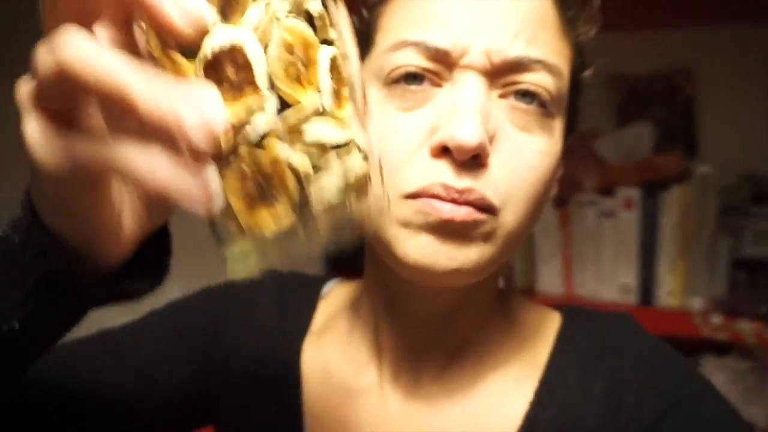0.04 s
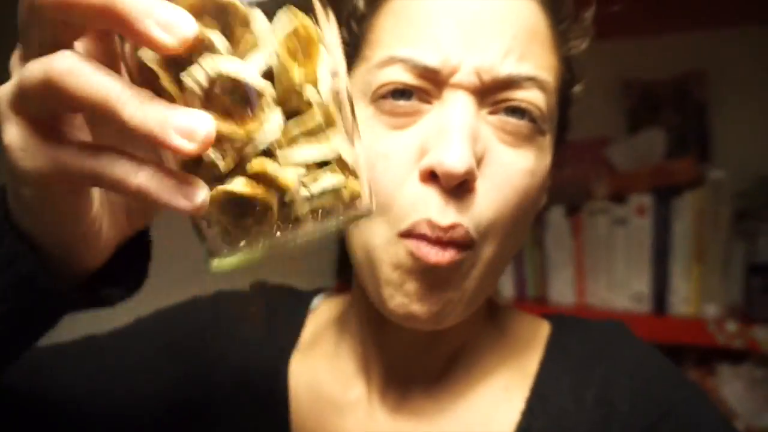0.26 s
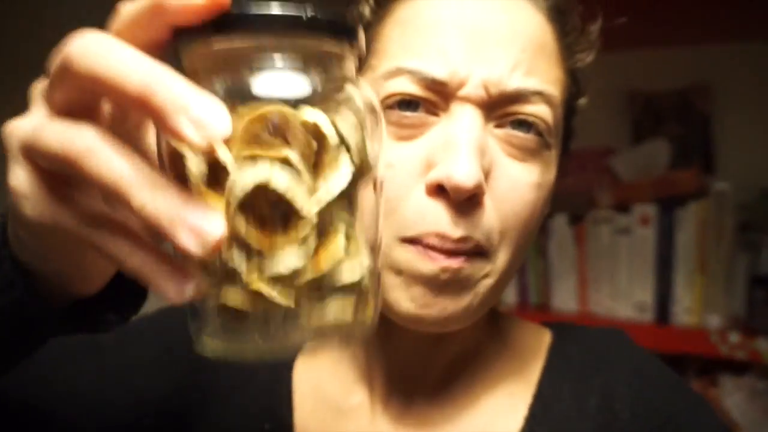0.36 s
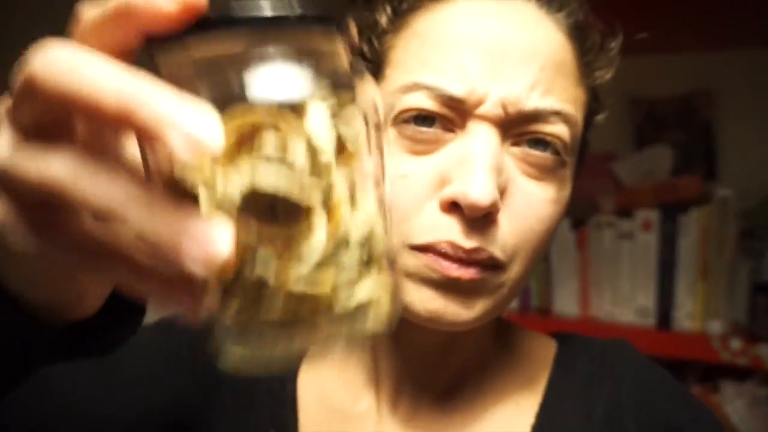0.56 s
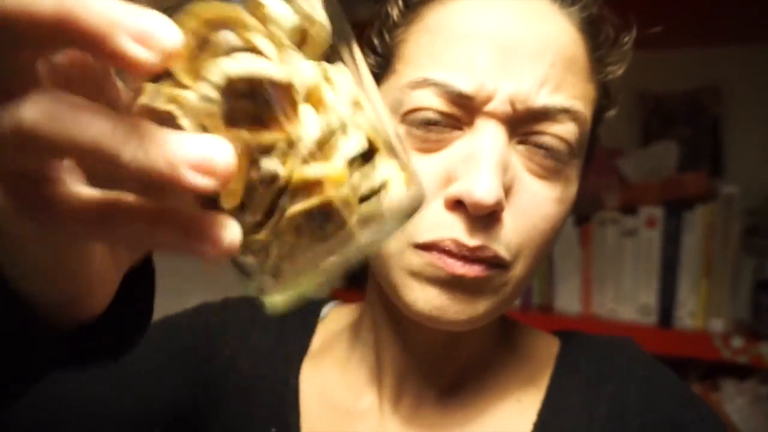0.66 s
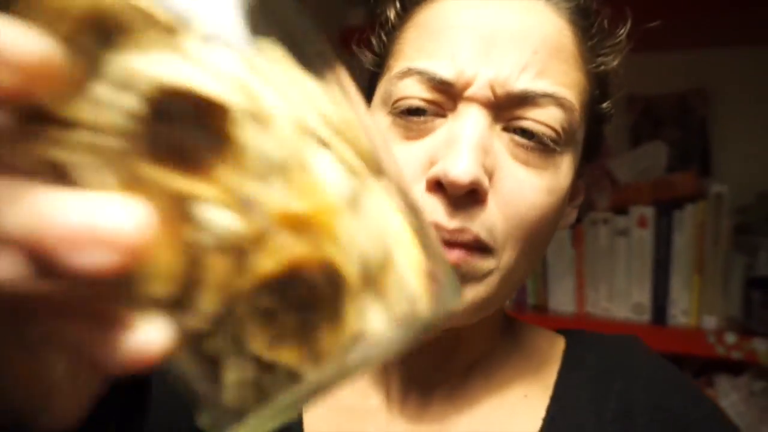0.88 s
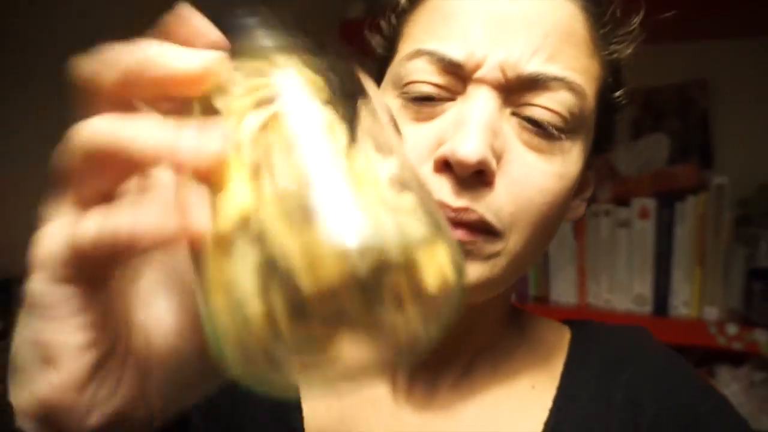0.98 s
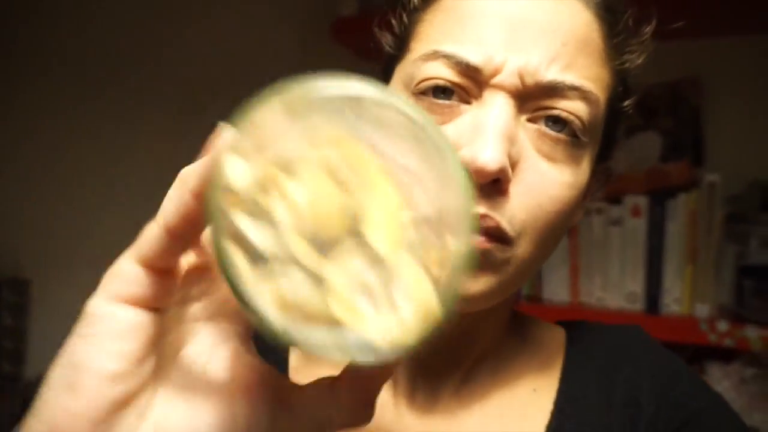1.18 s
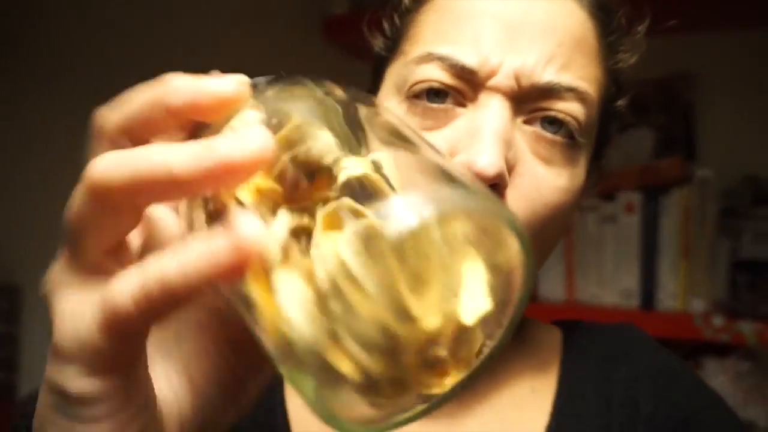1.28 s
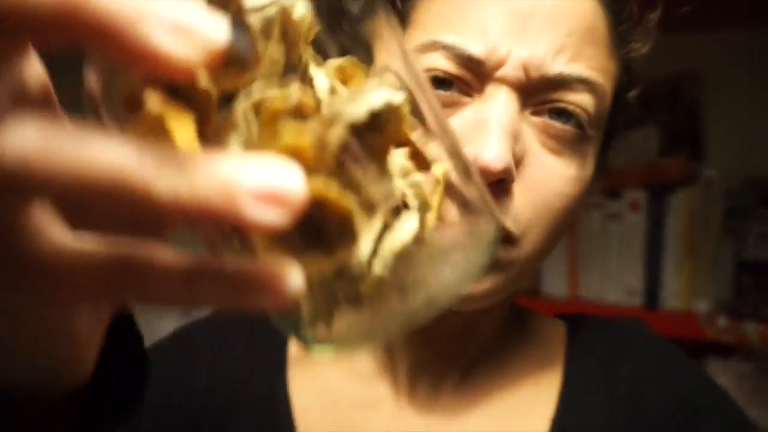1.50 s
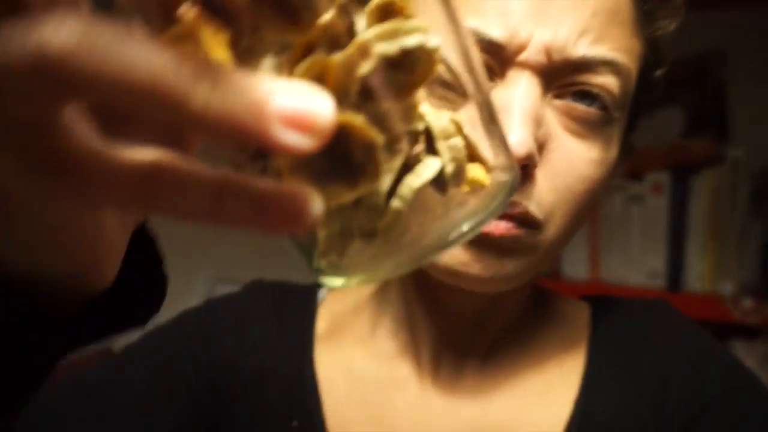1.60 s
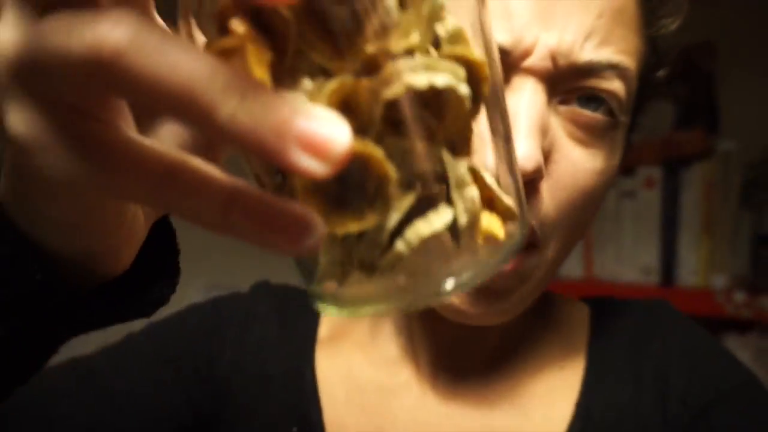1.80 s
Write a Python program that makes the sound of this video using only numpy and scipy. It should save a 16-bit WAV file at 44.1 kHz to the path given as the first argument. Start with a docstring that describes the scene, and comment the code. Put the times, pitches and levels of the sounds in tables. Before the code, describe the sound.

A glass jar of dry, hard slices is shaken about five times a second, clinking and knocking, then tipped so the heap rolls over and settles; close, stereo, nearly centred, with slight room reverberation and faint room tone.

```python
"""Hard dried fruit slices in a glass jar, close by in a small room, over quiet room tone.
In each of five shakes loose slices click on the wall (excited wall modes), the heap lands with a knock
(a short push that rings the body modes) and slices slide back (dense random touches filtered by the wall).
The jar is then tipped over: the heap tumbles along it in many dull blows, and a last few pieces settle."""
import sys
import numpy as np
from scipy import signal
from scipy.fft import rfft, irfft
from scipy.io import wavfile
from scipy.ndimage import uniform_filter1d

SR = 44100
rng = np.random.default_rng(int(sys.argv[2]) if len(sys.argv) > 2 else 0)


def dump_mix(stems):
    """Bounce the given channels to the path in sys.argv[1] as a 16-bit WAV at rate SR."""
    frames = np.atleast_2d(stems).T  # one column per channel
    limited = np.clip(frames, -1, 1)  # hard clip at full scale
    pcm = np.round(limited * 32767).astype(np.int16)
    wavfile.write(sys.argv[1], SR, pcm)


N = 81585  # length in samples

# Levels of single sources are dry, before the room, the left-right balance and the filters at the end.
# Levels of modes and spectra are relative; each ring also draws its mode levels and phases at random.

# Room tone spectrum: (frequency [Hz], relative density [dB per Hz])
TONE_SPECTRUM = [(25, -33), (48, -6.5), (75, -22.5), (100, -8), (130, -1), (200, -2.5), (310, -6),
                 (400, 0.5), (520, -2.5), (900, -15), (1500, -4.5), (2500, -13.5), (6000, -17),
                 (15000, -28)]
TONE_DB, TONE_WIDTH = -57, 0.19  # rms level; side over mid

# Single slices strike the glass: (time [s], then the level in each of the four CLICK_BANDS [dB])
SLICE_CLICKS = [(0.148, -43.5, -48.5, -51, -59), (.185, -24.5, -26, -26.5, -37),
                (0.1882, -30.5, -51, -36, -30), (0.24, -27, -49, -30, -37),
                (0.2501, -29.5, -28.5, -28, -26), (0.2644, -33.5, -38, -44, -42),
                (.301, -36.5, -57, -52, -49), (0.3835, -34, -40, -36, -39), (.389, -28.5, -28, -33, -29.5),
                (0.3958, -26.5, -27.5, -30, -37), (0.4014, -21.5, -49, -40, -43),
                (0.411, -22.5, -31, -34, -49), (0.457, -52, -32.5, -32, -48), (.465, -34, -40, -29.5, -35),
                (.575, -41, -38.5, -41, -39.5), (.594, -27.5, -32.5, -38, -40),
                (.601, -26, -36, -34.5, -47), (0.602, -30, -34.5, -45, -39),
                (0.649, -38, -28.5, -30.5, -37), (0.678, -58, -38, -33.5, -40),
                (0.779, -28.5, -38.5, -46, -60), (0.7924, -36, -33, -45, -37),
                (0.796, -28, -40.5, -47, -44), (0.804, -28, -46, -40, -45),
                (0.8096, -23.5, -31.5, -43, -31), (0.8479, -53, -30, -20, -55), (0.857, -52, -49, -35, -42),
                (0.8739, -33, -26, -30, -33), (0.897, -33, -31, -41, -49), (0.9726, -23, -29.5, -34, -43),
                (0.9836, -24, -57, -53, -55), (0.9944, -31, -53, -48, -50), (1.0047, -27.5, -39, -53, -60),
                (1.007, -34, -29, -42, -57), (1.016, -24, -31.5, -46, -52), (1.056, -48, -30, -41, -49),
                (1.066, -45, -33.5, -41, -34), (1.094, -41, -36, -32.5, -25),
                (1.116, -33.5, -33.5, -31, -32), (1.1366, -20.5, -26, -28, -35),
                (1.165, -32, -33, -39, -57), (1.2216, -34, -26, -23.5, -42), (1.348, -59, -36, -28.5, -47),
                (1.383, -42, -50, -37.5, -57), (1.493, -40.5, -38.5, -44.5, -48),
                (1.5084, -41.5, -78, -68, -49), (1.557, -37, -65, -56, -49),
                (1.5716, -28.5, -27.5, -43, -57), (1.5907, -36.5, -39, -59, -60),
                (1.615, -39, -42, -54, -71), (1.666, -60, -39, -43.5, -61), (1.695, -69, -56, -40, -63),
                (1.8065, -43, -73, -54, -72), (1.8136, -55, -76, -72, -66)]
# Edges of the four click bands: (frequency [Hz])
CLICK_BANDS = [900, 5200, 10200, 12500, 16500]
# Glass wall under a sharp touch: (frequency [Hz], click level [dB], slide level [dB], t60 [s])
WALL_MODES = [(968, -25, -20, .19), (2882, -11, -12, .15), (3880, -3, -7, .022), (4170, 2, -4, .028),
              (4416, -3, -8, .022), (6015, -10, -8, .06), (6290, -9, -9, .055), (7400, -3, -10, .011),
              (9090, -4, -4, .028), (11255, -1, -3, .042), (11400, -3, -5, .025), (13550, 0, -2, .018),
              (14300, -3, -2, .013)]
# Dry crack of a slice: (frequency [Hz], relative density [dB per Hz])
CRACK_SPECTRUM = [(100, -18), (600, -12), (1200, -9.5), (2300, -2.5), (4200, 8.5), (6500, 1), (8200, -3),
                  (10200, -8.5), (11300, -0.5), (12500, -7), (13500, 8.5), (15000, 4.5), (16000, -42)]
CLICK_CRACK_DB, SLIDE_CRACK_DB = 0, 3.5  # crack against wall ring
CRACK_T60_S, CRACK_WIDTH = 0.0032, 0.73  # width: side over mid
CONTACT_S, CHATTER = 0.0011, 0.71  # decay time and strength of the chatter after first contact
WALL_PHASE_RAD = 0.45  # phase offset of each ringing mode, opposite in the two channels

# Slices slide over the glass:
# (loudest at [s], rise [s], fall [s], rustle level [dB], treble tilt [dB per octave], singing level [dB])
SLIDES = [(0.167, 0.017, 0.037, -43.5, -4, -63), (0.248, 0.034, 0.054, -34, -2, -43.5),
          (0.396, 0.014, 0.034, -35, -5, -58), (0.473, 0.021, 0.065, -36, 1, -35.5),
          (.655, 0.017, 0.043, -32.5, -1, -34), (0.863, 0.038, 0.052, -33, -0.5, -35),
          (1.022, 0.037, 0.11, -37.5, -5, -56), (1.151, 0.036, 0.081, -33, -2.5, -45.5),
          (1.369, 0.019, .03, -47, -5, -38), (1.504, 0.019, 0.013, -44.5, -6.5, -51),
          (1.586, 0.034, 0.037, -44.5, -4.5, -44.5), (1.697, 0.041, 0.02, -58, 16, -44.5)]
# Close pair of modes that sings when the wall is rubbed: (frequency [Hz], relative level [dB], t60 [s])
SINGING_MODES = [(5913, -15, 0.19), (6030, -17, 0.04)]
GRAINS_PER_S, GRAIN_SPREAD_DB = 5000, 2

# The heap lands:
# (time [s], thud level [dB], low ring [dB], upper ring [dB], hollow note [Hz], hollow note level [dB])
KNOCKS = [(.206, -30, -28, -35, 1604, -25.5), (.4075, -22.5, -32, -23.5, 1516, -32.5),
          (.6127, -24.5, -20, -39, 1396, -36), (.824, -22.5, -25.5, -47, 1488, -30),
          (1.0147, -23.5, -21.5, -35, 818, -26.5), (1.018, -25.5, -44, -21.5, 2030, -31.5),
          (1.128, -23, -22, -63, 1197, -22.5), (1.1335, -19, -31, -56, 1190, -28),
          (1.138, -29, -27.5, -46, 1376, -29), (1.164, -24, -37, -39, 1516, -33),
          (1.183, -25.5, -45, -35, 1056, -27.5), (1.5702, -45, -52, -58, 1570, -73),
          (1.813, -53.5, -66, -59, 1580, -60)]
# Jar body under a knock: (frequency [Hz], relative level [dB], t60 [s])
LOW_MODES = [(969, 2, 0.11), (997.2, -8, 0.15), (931, -24, 0.15), (1604, -11.5, 0.087)]
# Higher modes of the jar under a knock: (frequency [Hz], relative level [dB], t60 [s])
UPPER_MODES = [(2882, 0, .13), (2046, -13, .08), (3742, -12, .06), (4170, -9, .05), (4416, -11, .06)]
# Dull thud of the heap: (frequency [Hz], relative density [dB per Hz])
THUD_SPECTRUM = [(40, -72), (200, -55.5), (450, -10.5), (700, -5.5), (950, 9), (1400, 1.5), (2200, -3),
                 (3500, -23), (6000, -17.5), (15000, -51)]
PUSH_DB = 2  # single push against the scatter of small thuds
THUD_T60_S, HOLLOW_T60_S = 0.012, 0.092
THUD_WIDTH = 0.06  # side over mid of the thuds, and phase offset [rad] of the body modes

# The heap rolls along the jar: (loudest at [s], rise [s], fall [s], level [dB])
TUMBLES = [(1.142, 0.0047, 0.026, -29.5), (1.178, 0.017, 0.041, -34.5), (1.272, .006, .015, -35.5),
           (1.293, 0.0035, 0.018, -34), (1.312, 0.0087, 0.042, -32.5), (1.38, .01, 0.024, -44),
           (1.453, 0.014, .035, -48.5)]
# Clatter of the rolling heap: (frequency [Hz], relative density [dB per Hz])
CLATTER_SPECTRUM = [(100, -50), (300, -24.5), (550, -11.5), (780, -21), (1000, -6.5), (1300, -1.5),
                    (1800, -8), (2800, -10.5), (4500, -15), (12000, -28.5)]
LUMPS_PER_S, LUMP_SPREAD_DB = 900, 5
ROLL_RING_DB = -14  # body ring against clatter

# Decay of the room: (frequency [Hz], t60 [s])
ROOM_DECAY = [(200, 0.68), (1000, 0.48), (4000, 0.42), (14000, 0.083)]
GLASS_TAIL_DB, BODY_TAIL_DB = -13, -12.5  # tail against direct sound
EARLY_DB, EARLY_T60_S = -8.5, 0.062

LEVEL_SPAN_S = 0.006  # click and thud levels are the rms of their energy over this span
MODE_SPREAD_DB = 4.5  # largest random change of a mode's level, up or down
GLASS_LEFT_DB, BODY_LEFT_DB = 0.28, 0.24  # gain on the left, the same loss on the right
LEFT_LEAD_SAMPLES = 2
JAR_LOWEST_HZ, EDGE_HZ = 454, 15700  # high-pass of the jar; low-pass of the whole
SIDES = np.array([[1], [-1]])  # left, right


def amp(db):
    """Level to amplitude: 20 dB is a factor of ten."""
    return 10 ** (np.asarray(db) / 20)


def unit(x):
    """Energy normalization: scales stereo to a mean energy of one per channel."""
    return x / np.sqrt(np.sum(x ** 2) / 2 + 1e-20)


def read(points, hz):
    """Interpolation linear in log frequency."""
    f, value = np.transpose(points)
    return np.interp(np.log(hz + 1), np.log(f + 1), value)


def noise(width, size):
    """Mid-side stereo: two independent noises, width being side over mid."""
    mid, side = rng.standard_normal((2, size))
    return np.array([mid + width * side, mid - width * side])


def room_tone():
    """Stationary noise: white noise shaped in the frequency domain."""
    gain = amp(read(TONE_SPECTRUM, np.fft.rfftfreq(N, 1 / SR)))
    tone = irfft(rfft(noise(TONE_WIDTH, N)) * gain, N)
    return amp(TONE_DB) * np.sqrt(N) * unit(tone)


def add(mix, s, sound):
    """Superposition: mixes a sound in at time s."""
    part = mix[:, max(round(s * SR), 0):][:, :sound.shape[1]]
    part += sound[:, :part.shape[1]]


def convolve(a, b):
    """Linear response: convolution, channel by channel."""
    return signal.fftconvolve(np.atleast_2d(a), np.atleast_2d(b), axes=1)[:, :N]


def band(x, lo, hi, order=3):
    """Band-pass filtering with a Butterworth response."""
    return signal.sosfilt(signal.butter(order, [lo, hi], "band", fs=SR, output="sos"), x)


def colour(points, size=1024):
    """Minimum phase: the Hilbert transform of log gain gives a causal impulse response."""
    hz = abs(np.fft.fftfreq(size, 1 / SR))
    log_gain = np.log(amp(read(points, hz)))
    return np.fft.ifft(np.exp(np.conj(signal.hilbert(log_gain)))).real


def burst(points, t60, width, size=8192):
    """Broadband impact: noise decays exponentially and is coloured by a spectrum."""
    decay = amp(-60 * np.arange(size) / SR / t60)
    return unit(convolve(noise(width, size) * decay, colour(points))[:, :size])


def ring(modes, phase_rad, size=8192):
    """Modal superposition: decaying sines, unevenly excited and out of step between the channels."""
    t = np.arange(size) / SR
    out = np.zeros((2, size))
    for hz, db, t60 in modes:
        level_db = db + MODE_SPREAD_DB * rng.uniform(-1, 1)
        phase = phase_rad * rng.choice([-1, 1]) * SIDES
        out += amp(level_db - 60 * t / t60) * np.sin(2 * np.pi * hz * t + phase)
    return out


def touched_wall(modes, crack_db):
    """Impulse response of a touch: the ringing wall plus the dry crack of the slice."""
    crack = burst(CRACK_SPECTRUM, CRACK_T60_S, CRACK_WIDTH)
    return unit(ring(modes, WALL_PHASE_RAD)) + amp(crack_db) * crack


def clicks(size=8192):
    """Impact excitation: a slice chatters on the wall; where it lands sets which bands speak."""
    out = np.zeros((2, N))
    t = np.arange(size) / SR
    modes = [(hz, click_db, t60) for hz, click_db, _, t60 in WALL_MODES]
    for s, *levels_db in SLICE_CLICKS:
        chatter_envelope = np.sqrt(t / CONTACT_S) * np.exp(-t / CONTACT_S)
        contact = (t == 0) + CHATTER * rng.standard_normal(size) * chatter_envelope
        touch = convolve(contact, touched_wall(modes, CLICK_CRACK_DB))[:, :size]
        for lo, hi, db in zip(CLICK_BANDS, CLICK_BANDS[1:], levels_db):
            add(out, s, amp(db) * np.sqrt(LEVEL_SPAN_S * SR) * unit(band(touch, lo, hi)))
    return out


def grains(per_s, spread_db):
    """Random point process: touches of uneven strength, evened out to an rms near one over 20 ms."""
    strength = amp(spread_db * np.minimum(rng.exponential(1, N), 4))
    happens = rng.random(N) < per_s / SR
    x = strength * rng.choice([-1, 1], N) * happens
    return x / np.sqrt(abs(uniform_filter1d(x ** 2, size=882)) + 1e-6)


def swell(s, rise, fall):
    """Envelope: Gaussian rise to time s, then exponential fall."""
    t = np.arange(N) / SR - s
    return np.exp(-(np.minimum(t, 0) / rise) ** 2 / 2 - np.maximum(t, 0) / fall)


def slides():
    """Friction as dense tiny touches: rough edges rustle and keep the wall's high modes singing."""
    out = np.zeros((2, N))
    modes = [(hz, slide_db, t60) for hz, _, slide_db, t60 in WALL_MODES]
    for s, rise, fall, rustle_db, tilt_db, singing_db in SLIDES:
        tilt = colour([(1000, 0), (16000, np.log2(16) * tilt_db)])
        wall = unit(band(convolve(touched_wall(modes, SLIDE_CRACK_DB), tilt), 600, 15500))
        touches = grains(GRAINS_PER_S, GRAIN_SPREAD_DB) * swell(s, rise, fall)
        singing = unit(convolve(touches, ring(SINGING_MODES, WALL_PHASE_RAD)))
        singing *= np.linalg.norm(touches)  # as much energy as the touches
        out += amp(rustle_db) * convolve(touches, wall) + amp(singing_db) * singing
    return out


def knocks():
    """Inelastic landing: a push, small thuds, a hollow note that changes as the heap shifts, and ring."""
    out = np.zeros((2, N))
    push = unit(np.tile(colour(THUD_SPECTRUM, size=8192), (2, 1)))
    for s, thud_db, low_db, upper_db, hollow_hz, hollow_db in KNOCKS:
        small_thuds = burst(THUD_SPECTRUM, THUD_T60_S, THUD_WIDTH)
        thud = amp(thud_db) * np.sqrt(LEVEL_SPAN_S * SR) * unit(amp(PUSH_DB) * push + small_thuds)
        hollow = ring([(hollow_hz, hollow_db, HOLLOW_T60_S)], THUD_WIDTH)
        low_ring = amp(low_db) * ring(LOW_MODES, THUD_WIDTH)
        upper_ring = amp(upper_db) * ring(UPPER_MODES, WALL_PHASE_RAD)
        add(out, s, thud + hollow + low_ring + upper_ring)
    return out


def tumbles():
    """Repeated impact: many small dull blows as the heap rolls over set the body ringing softly."""
    out = np.zeros((2, N))
    for s, rise, fall, db in TUMBLES:
        clatter = burst(CLATTER_SPECTRUM, t60=0.015, width=0.19)
        blow = clatter + amp(ROLL_RING_DB) * unit(ring(LOW_MODES, THUD_WIDTH))
        blows = grains(LUMPS_PER_S, LUMP_SPREAD_DB) * swell(s, rise, fall)
        out += amp(db) * convolve(blows, blow)
    return out


def room(x, tail_db, width, size=22050):
    """Reverberation: direct sound, sparse near reflections and a tail whose decay depends on frequency."""
    hz, t, z = signal.stft(noise(width, size), SR, nperseg=256)
    decay = amp(-60 * t / read(ROOM_DECAY, hz)[:, None])
    tail = signal.istft(z * decay, SR, nperseg=256)[1][:, :size]
    t = np.arange(size) / SR
    sparse = noise(width, size) * (rng.random(size) < 0.02)
    early = sparse * amp(-60 * t / EARLY_T60_S) * (t > 0.002)
    reflections = amp(tail_db) * unit(tail * (t > 0.008)) + amp(EARLY_DB) * unit(early)
    return x + convolve(x, reflections)


def scene():
    """Radiation limit: a jar too small to radiate bass, a little to the left, over room tone."""
    tone = room_tone()
    glass = room((clicks() + slides()) * amp(GLASS_LEFT_DB * SIDES), GLASS_TAIL_DB, width=1.0)
    body = room((knocks() + tumbles()) * amp(BODY_LEFT_DB * SIDES), BODY_TAIL_DB, width=0.35)
    body[1] = np.roll(body[1], LEFT_LEAD_SAMPLES)  # the right channel lags
    no_bass = signal.butter(3, JAR_LOWEST_HZ, "high", fs=SR, output="sos")
    return signal.sosfilt(no_bass, glass + body) + tone


def record(dry):
    """Band limit: a linear-phase low-pass."""
    low_pass = signal.firwin(201, EDGE_HZ, window=("kaiser", 9), fs=SR)
    return signal.oaconvolve(dry, low_pass[None], "same")


dry = scene()
out = record(dry)
dump_mix(out)
```